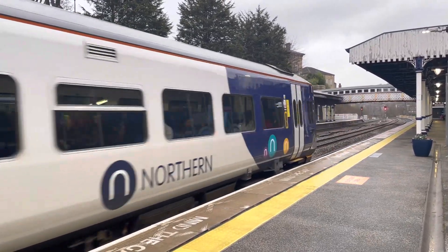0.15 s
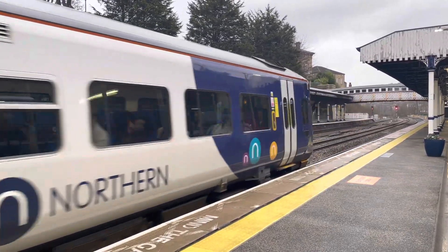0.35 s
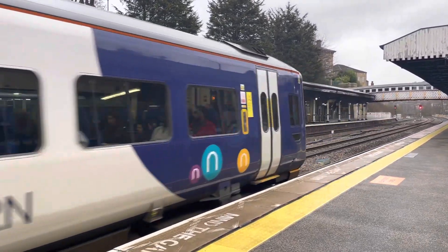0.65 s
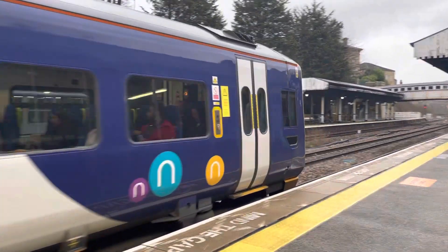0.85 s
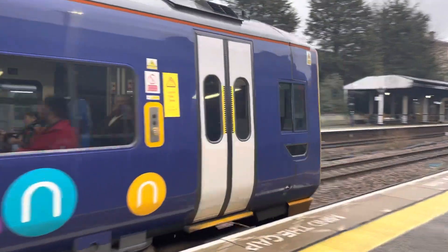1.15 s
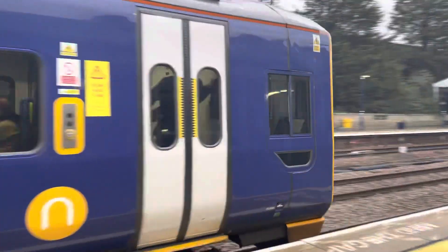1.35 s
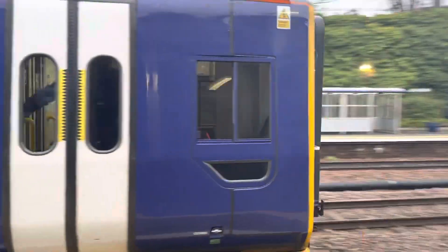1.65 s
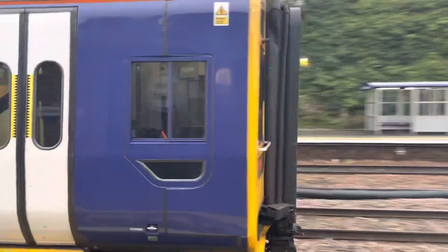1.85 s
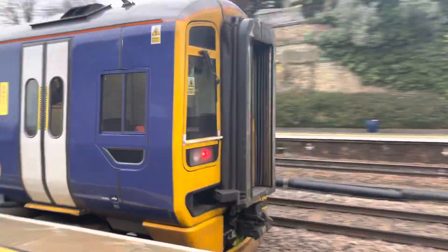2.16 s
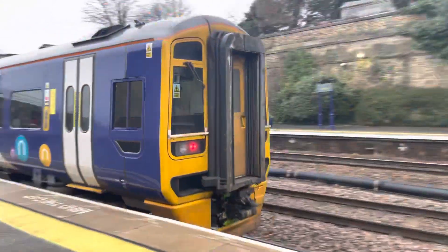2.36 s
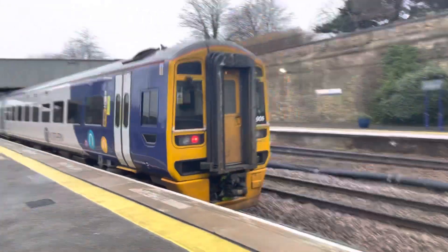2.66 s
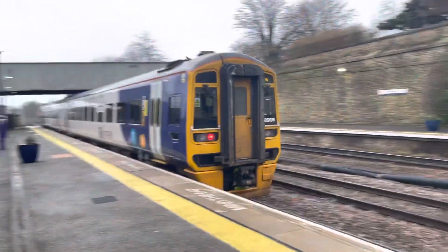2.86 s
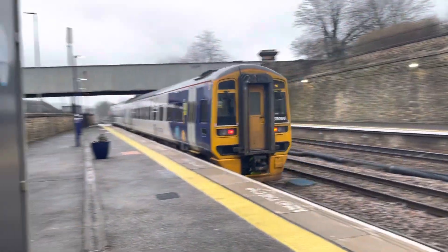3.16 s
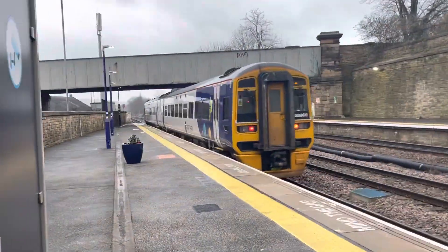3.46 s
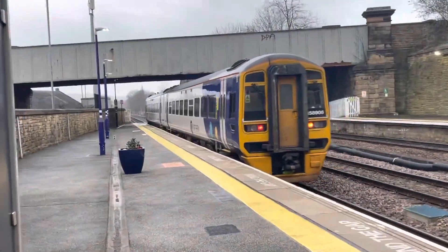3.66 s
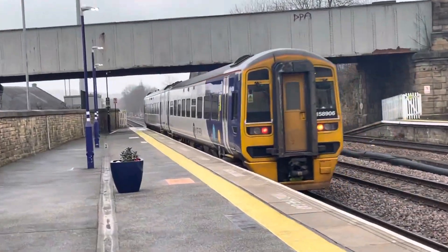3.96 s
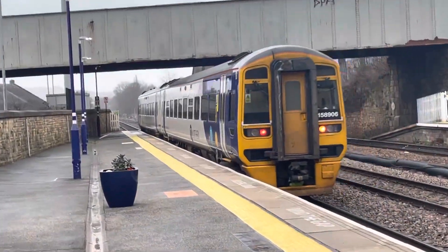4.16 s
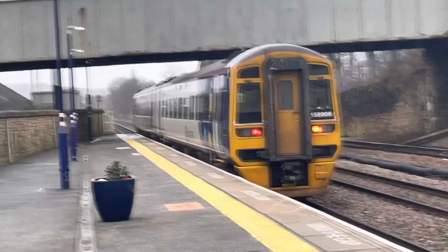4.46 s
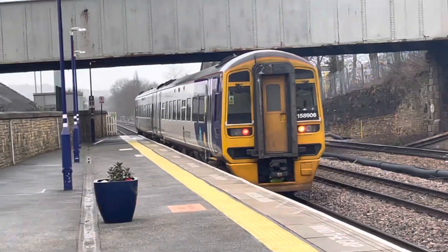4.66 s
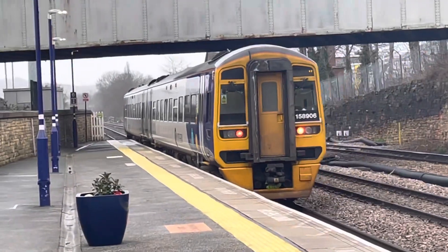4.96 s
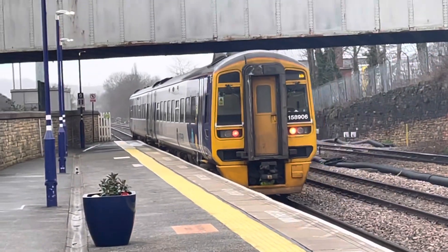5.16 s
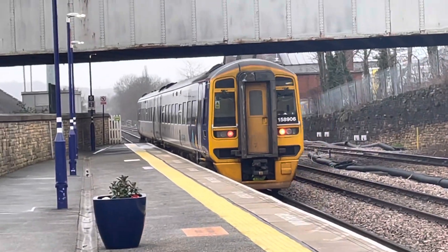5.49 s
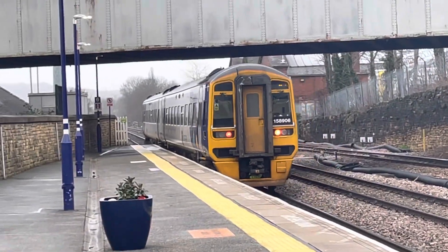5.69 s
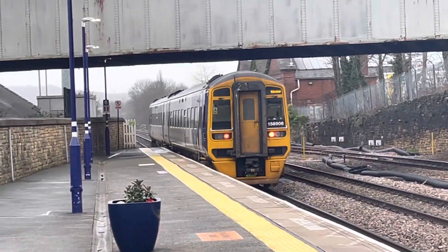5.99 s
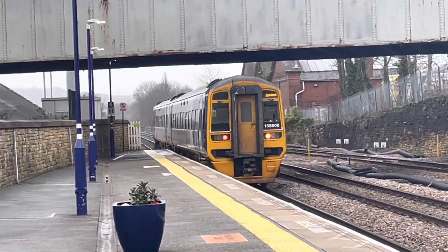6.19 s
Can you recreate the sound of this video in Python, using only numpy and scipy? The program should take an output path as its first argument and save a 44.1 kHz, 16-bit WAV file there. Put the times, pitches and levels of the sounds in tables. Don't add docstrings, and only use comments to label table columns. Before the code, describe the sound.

A diesel passenger train departs under power beside an open-air platform, heard on a handheld phone. Two underfloor engines slightly out of step make a beating low drone inside a broad rough roar, with gear whine above. Around one second the last wheels knock hard over a rail joint in two clusters. Wind rumbles on the microphone while the roar loses its close edge and settles ahead.

```python
import sys
import numpy as np
from scipy import signal
from scipy.fft import rfft, irfft, next_fast_len
from scipy.io import wavfile

SR = 44100
rng = np.random.default_rng(int(sys.argv[2]) if len(sys.argv) > 2 else 0)


def field_ratio(decibels):
    return 10 ** (np.asarray(decibels, dtype=float) / 20)


def wav_record(signal):
    frames = np.transpose(np.atleast_2d(signal))
    bounded = np.clip(frames, -1, 1)
    quanta = np.round(bounded * 32767).astype(np.int16)
    wavfile.write(sys.argv[1], SR, quanta)


N = 279153


def rms_one(x):
    return x / np.sqrt(np.mean(x ** 2) + 1e-20)


def in_time(rows):
    s, *columns = np.transpose(rows)
    return [np.interp(np.arange(N) / SR, s, c) for c in columns]


def at_hz(points, hz):
    points = np.array(points)
    return np.interp(np.log(hz), np.log(points[:, 0]), points[:, 1])


def drift(rate_hz):
    pole = np.exp(-80 * np.pi * rate_hz / SR)
    white = rng.standard_normal(N // 40 + 2002)
    slow = signal.lfilter([1], [1, -2 * pole, pole * pole], white)[2000:]
    return np.interp(np.arange(N) / 40, np.arange(len(slow)), rms_one(slow))


def band(x, low_hz, high_hz, order=2):
    return signal.sosfilt(signal.butter(order, [low_hz, high_hz], "band", fs=SR, output="sos"), x)


def turning(hz):
    return 2 * np.pi * np.cumsum(hz) / SR


def narrow(phase, width_hz):
    pole = np.exp(-10 * np.pi * width_hz / SR)
    white = rng.standard_normal((2, N // 10 + 2))
    a, b = signal.lfilter([1], [1, -2 * pole, pole * pole], white)
    slow = np.interp(np.arange(N) / 10, np.arange(len(a)), a + 1j * b)
    return rms_one((slow * np.exp(1j * phase)).real)


def swells(rows, floor_db):
    t = np.arange(N) / SR
    bells = sum(field_ratio(db) ** 2 * np.exp(-((t - s) / half) ** 2) for s, db, half in rows)
    return np.sqrt(field_ratio(floor_db) ** 2 + bells)


# [time_s, firing_hz]
REAR_FIRING = [(0, 80.5), (1.1, 80.5), (1.7, 79.32), (5.3, 78.78), (6.05, 84.7), (6.33, 86)]
# [time_s, firing_hz]
MIDDLE_FIRING = [(0, 80.4), (1.7, 80.26), (2.25, 79.9), (2.45, 81.9), (2.8, 79.74), (3.25, 79.8),
                 (3.5, 81.2), (4.4, 80.55), (4.7, 78.73), (5.5, 78.6), (5.8, 83), (6.33, 86.1)]
# [time_s, following_swell_db, front_minus_rear_db]
OPPOSED_FIRINGS = [(-0.2, -15.5, 6), (0.26, -14.5, -11.5), (0.735, -13.5, -0.5), (1.225, -20.5, -4.5),
                   (1.77, -23, -1.5), (2.3, -28.5, -6), (2.69, -18.5, -7), (3.1, -16, -7), (3.5, -17, 4.5),
                   (3.93, -14.5, -1), (4.34, -18.5, 0.5), (4.81, -23, -1.5), (5.14, -19, 2),
                   (5.58, -19.5, -9), (6.08, -24.5, 0.5), (6.5, -24, 3)]
# [time_s, rear_db, front_re_rear_db]
EXHAUST_DRONE = [(0.0, -20, 0.5), (0.2, -25.5, -4), (0.6, -24.5, -3.5), (0.8, -24, -10), (0.98, -20, -8),
                 (1.2, -31, -10), (1.55, -29, 0), (1.85, -23.5, -18), (1.95, -28.5, -19), (2.15, -19, -32),
                 (2.4, -16, -41), (3.05, -25.5, -3.5), (3.3, -25, 0), (4.1, -26, -4.5), (4.5, -27.5, -11),
                 (4.9, -22.5, -8), (5.45, -29, -5.5), (6.33, -27, -25)]
# [time_s, beats_counted]
EXHAUST_BEATS = [(0, -1.3), (.27, 0), (.85, 3), (3.12, 16), (4.0, 21), (4.59, 25), (6.0, 34), (6.33, 36)]
# [multiple, level_db]
UNEVEN_ORDERS = [(4, -34.5), (8, -35), (9, -37), (11, -39.5)]


def engines():
    t = np.arange(N) / SR
    s, swell_db, lead_db = np.transpose(OPPOSED_FIRINGS)
    half_gap = np.pi * (np.interp(t, s, np.arange(len(s))) + 0.5)
    front = field_ratio(np.interp(t, s, lead_db))
    middle = turning(in_time(MIDDLE_FIRING)[0])
    beat_db = np.interp(t, (s[1:] + s[:-1]) / 2, swell_db[:-1]) + 1.6 * drift(6.7)
    firing = np.sin(middle - half_gap) + front * np.sin(middle + half_gap)
    out = field_ratio(beat_db) / (1 + front) * firing

    rear_hz = in_time(REAR_FIRING)[0]
    rear = turning(rear_hz)
    gap = 2 * np.pi * (in_time(EXHAUST_BEATS)[0] + 0.5)
    drone_db, front_db = in_time(EXHAUST_DRONE)
    drone = np.sin(2 * rear) + field_ratio(front_db) * np.sin(2 * rear + gap)
    out += field_ratio(drone_db - 3.0 + 1.2 * drift(12)) * drone

    even_db = -2.5 * np.maximum(rear_hz - 80.5, 0)
    for multiple, level_db in UNEVEN_ORDERS:
        gain = field_ratio(level_db + even_db - 2.5 + 4.2 * drift(5.6))
        out += gain * np.sin(round(multiple) * rear / 3 + 0.96 * drift(2.3))
    return np.sqrt(2) * out


# [time_s, firing_hz]
FRONT_FIRING = [(0, 82.67), (1.2, 81.95), (5.3, 81.94), (6.05, 87.53), (6.33, 88.6)]
# [multiple_of_front_firing, width_hz, near_db, far_db]
GEAR_WHINE = [(4, 14, -29, -42.5), (7.985, 9.5, -29.5, -44), (12.01, 17, -29.5, -48.5),
              (15.88, 56, -30.5, -46), (20.12, 40, -39, -52.5), (25.51, 270, -39.5, -46.5)]
# [pitch_hz, width_hz, near_db, far_db]
BLOWER_DUCTS = [(5930, 700, -45.5, -53.5), (3317, 210, -63, -52), (3640, 230, -61, -53.5)]
# [centre_s, level_db, half_length_s]
TOOTH_SWELLS = [(1.95, -43, 0.21), (2.57, -44, .06), (3.07, -38, 0.088), (3.27, -38, 0.085),
                (4.0, -39, 0.36), (5.0, -36.5, 0.28), (5.9, -41.5, .5)]
# [centre_s, level_db, half_length_s]
RAIL_SWELLS = [(0.04, -20, 0.028), (0.92, -28.5, .15), (1.95, -37, 0.54), (2.75, -30, 0.32),
               (3.3, -36, 0.27), (5.4, -38, 0.14)]


def whine(near):
    front_hz = in_time(FRONT_FIRING)[0]
    teeth, still = turning(front_hz), turning(np.ones(N))
    tooth_gain = np.hypot(field_ratio(-37.5) * near, swells(TOOTH_SWELLS, -51.5))
    pair = 0.43 * narrow(23.2 * teeth, width_hz=26) + 0.6 * narrow(23.9 * teeth, width_hz=56)
    out = tooth_gain * pair

    fade_db = 0.5 * np.maximum(front_hz - 82.5, 0)
    blower_gain = np.hypot(field_ratio(-36.5) * near, field_ratio(-47.5 + 1.5 * drift(0.83) - fade_db))
    out += blower_gain * narrow(1985 * still + 24.1 * teeth, width_hz=174)
    out += field_ratio(-3) * swells(RAIL_SWELLS, -43) * narrow(735 * still, width_hz=168)

    for table, phase in (GEAR_WHINE, teeth), (BLOWER_DUCTS, still):
        for multiple, width_hz, near_db, far_db in table:
            gain = np.hypot(field_ratio(near_db) * near, field_ratio(far_db + 0.97 * drift(0.98)))
            out += gain * narrow(multiple * phase, width_hz)
    return out


# [centre_hz, level_db_per_hz]
NEAR_SPECTRUM = [(40, -52), (100, -57), (200, -52.5), (400, -52.5), (700, -51), (1100, -51.5), (1600, -61),
                 (2300, -63), (3300, -64.5), (5000, -71.5), (7000, -85.5), (9000, -74.5), (10500, -92),
                 (12500, -78)]
# [centre_hz, level_db_per_hz]
FAR_SPECTRUM = [(40, -57), (100, -57.5), (200, -51), (400, -55.5), (700, -62), (1100, -64), (1600, -72),
                (2300, -71), (3300, -75), (5000, -82), (7000, -99.5), (8700, -77.5), (10500, -91.5),
                (12500, -87.5)]
# [time_s, hiss_hz, hiss_db, roar_above_11_khz_db]
TOP_BAND = [(0, 13000, -110, 0), (5.45, 13000, -105, 3.5), (5.7, 13300, -76, -4), (6.33, 13400, -77, -9)]


def roar(near, far, air, bridge, bogie):
    out, edges_hz = 0, 36 * 2 ** (np.arange(27) / 3)
    white = rng.standard_normal((2, 2, N)) * np.sqrt(SR / 2)
    puffs = 1 + 0.035 * np.cos(turning(in_time(REAR_FIRING)[0]))
    swell = field_ratio(0.5 * drift(3.4)) * puffs
    for k, (low_hz, high_hz) in enumerate(zip(edges_hz, edges_hz[1:])):
        hz = np.sqrt(low_hz * high_hz)
        passing = 1
        if 2100 < hz < 5500:
            passing = bridge
        elif 280 < hz < 1400:
            passing = bogie
        near_gain = field_ratio(at_hz(NEAR_SPECTRUM, hz)) * near
        far_gain = field_ratio(at_hz(FAR_SPECTRUM, hz)) * far * passing
        gain = np.hypot(near_gain, far_gain) * field_ratio(1.5 * drift(7.5))
        if hz > 7000:
            gain = gain * air
        out = out + gain * band(white[k % 2], low_hz, high_hz)
    top = band(out, 11000, 15500)
    return (out + (field_ratio(in_time(TOP_BAND)[2]) - 1) * top) * swell


# [centre_s, deep_db, half_length_s, upper_minus_deep_db]
WIND_GUSTS = [(0.0, -40, .07, 4), (0.523, -30, 0.17, -6), (0.684, -31, 0.075, 4), (0.818, -24, 0.084, -16),
              (1.01, -23, 0.11, -0.5), (1.26, -23.5, 0.16, 1), (1.517, -24.5, 0.093, -4),
              (1.8, -33.5, 0.23, 3.5), (2.16, -36, 0.08, 1), (2.877, -25, 0.15, -5), (3.06, -29, 0.055, 3),
              (3.18, -26.5, 0.084, -1), (3.43, -23, .08, -12), (3.64, -22.5, 0.054, -3),
              (3.944, -32.5, 0.076, 4), (4.42, -22, 0.071, -20), (4.57, -35, 0.063, -1),
              (4.932, -30, 0.14, 3.5), (5.232, -28, .07, 4.5), (5.37, -33.5, 0.05, 8.5),
              (5.55, -33, .13, -3)]


def gusts():
    calm_db = -43
    deep = rms_one(band(rng.standard_normal(N), 49.8, 70.5))
    upper = rms_one(band(rng.standard_normal(N), 80, 132.5))
    deep_gain = swells([row[:3] for row in WIND_GUSTS], calm_db)
    upper_rows = [(s, db + upper_db, half) for s, db, half, upper_db in WIND_GUSTS]
    upper_gain = swells(upper_rows, calm_db - 7.0)
    return deep_gain * field_ratio(1.8 * drift(11)) * deep + upper_gain * field_ratio(3.0 * drift(16.4)) * upper


# [start_s, peak_db, ring_hz, blow_length_s, rattle_db]
JOINT_BLOWS = [
    (0.97, -2, 274, 0.0039, -10.5),
    (0.988, -8, 285, .008, -8.5),
    (1.064, -15.5, 178, 0.00645, -6),
    (1.133, -16.5, 269, 0.0077, -3),
    (1.237, -15, 236, 0.0062, -6.5),
    (1.309, -1, 280, 0.0032, -13),
    (1.329, -18, 340, 0.0056, -7.5),
    (1.366, -19.5, 327, 0.0044, -4.5),
]


def joint():
    out, t = np.zeros(N), np.arange(SR // 8) / SR
    for start_s, level_db, hz, length_s, rattle_db in JOINT_BLOWS:
        bell = np.exp(-((t - 1.38 * length_s) / length_s) ** 2)
        thud = bell * -np.cos(2 * np.pi * hz * (t - 1.544 * length_s))
        rattle_env = np.clip(t / (4 * length_s), 0, 1) ** 2 * np.exp(-t / 0.032)
        rattle_noise = rms_one(band(rng.standard_normal(len(t)), 290, 430))
        rattle = field_ratio(rattle_db) * rattle_env * rattle_noise
        crack_noise = rms_one(band(rng.standard_normal(len(t)), 500, 1630, order=1))
        crack = field_ratio(-26) * np.exp(-t / 0.0099) * crack_noise
        at = round(start_s * SR)
        out[at:at + len(t)] += field_ratio(level_db + 1.5) * (thud + rattle + crack)
    return out


# [time_s, left_share_0_1, left_minus_right_db, middle_band_width_0_1]
TRAIN_BEARING = [(0, 0.75, -1.5, 0.5), (2.3, 0.52, -0.5, 0.7), (2.9, 0.27, 1, 0.98), (3.53, 0.12, 2, 1),
                 (3.57, 0, 0, 0.19), (6.33, 0, 0, 0.02)]
# [pitch_hz, re_direct_db]
ECHO_SPECTRUM = [(60, -2), (300, -13.5), (700, -9.5), (1300, -6), (1950, 0.5), (2300, -8.5), (4300, -16.5),
                 (6000, -1), (6400, -14), (8300, -19), (10200, -11), (10500, -24), (12200, -24),
                 (12500, -7.5)]
# [pitch_hz, right_lead_rad]
HOUSING_PHASE = [(60, 0), (900, -.35), (1700, .6), (2200, 0), (6000, 0), (6900, .7), (7500, 2.2),
                 (7800, 2.95), (8200, np.pi), (8700, 3.3), (9100, 4.0), (10300, 5.3), (10600, 6.0),
                 (11400, 2 * np.pi), (12200, 6.55), (13000, 7.3), (14000, 9.4)]
# [pitch_hz, left_minus_right_db]
PORT_BALANCE = [(60, -1.5), (250, -2.5), (600, 1), (1400, 2.5), (2500, 1)]
# [pitch_hz, left_minus_right_db]
HOUSING_SHADE = [(1000, 0), (1500, -9), (2100, -8), (3300, 1.5), (5500, -4), (7500, -2.5)]


def ports(left, ahead, echoes):
    left_lead_s = 0.000447
    pan_db, width = in_time(TRAIN_BEARING)[1:]
    size, side = next_fast_len(N), np.array([[1], [-1]])
    hz = np.maximum(np.fft.rfftfreq(size, 1 / SR), 1)
    housing = at_hz(HOUSING_PHASE, hz)
    tilt = field_ratio(side * at_hz(PORT_BALANCE, hz) / 2)
    shade = field_ratio(side * at_hz(HOUSING_SHADE, hz) / 2)
    lag = np.where(hz < 6100, 2 * np.pi * hz * left_lead_s, -housing)
    from_left = irfft(rfft(left, size) * np.exp(0.5j * side * lag) * tilt * shade, size)[:, :N]
    from_ahead = irfft(rfft(ahead, size) * np.exp(-0.5j * side * housing) * tilt, size)[:, :N]
    echo = rfft(echoes, size) * field_ratio(at_hz(ECHO_SPECTRUM, hz))
    middle = (hz > 2200) & (hz < 6500)
    wide = irfft(echo * ~middle, size)[:N] + width * irfft(echo * middle, size)[:N]
    return from_left * field_ratio(side * pan_db / 2) + from_ahead + side * wide


# [time_s, level_db]
TRAIN_LEVEL = [(0, -24), (.3, 2.5), (.6, 1), (.9, -1.5), (1.7, -0.5), (2.1, 1.5), (2.5, -1), (3, -1),
               (3.75, -1.5), (4.5, -1.5), (6, -2), (6.33, -1)]
# [centre_s, level_db, half_length_s]
FACING_HISS = [(3.2, -3.5, 0.58)]
# [centre_s, re_roar_db, half_length_s]
BRIDGE_ECHO = [(4.6, -0.034, 0.83)]
# [centre_s, re_roar_db, half_length_s]
BOGIE_PASS = [(1.75, 0.6, 0.28)]


def scene():
    t = np.arange(N) / SR
    engine_db, shadow_db_per_s, gap_m, speed_m_s = -0.5, 2, 3.1, 6.34
    near = field_ratio(engine_db - shadow_db_per_s * t) * gap_m / np.hypot(gap_m, speed_m_s * t)
    far = field_ratio(in_time(TRAIN_LEVEL)[0])
    air = np.hypot(field_ratio(2.5) * near, swells(FACING_HISS, -3))
    share = np.clip(in_time(TRAIN_BEARING)[0], 0, 1)
    left, ahead = roar(near, far, air, swells(BRIDGE_ECHO, -1.1), swells(BOGIE_PASS, -0.45))
    low, teeth = engines() + gusts(), whine(near)
    echoes = np.roll(ahead + 0.2 * teeth + 0.038 * low, SR // 12)
    left = np.sqrt(share) * (left + teeth) + share * low + joint()
    ahead = np.sqrt(1 - share) * (ahead + np.roll(teeth, SR // 20)) + (1 - share) * low
    return ports(left, ahead, echoes)


def top_cut(x):
    return signal.sosfilt(signal.butter(12, 13900, fs=SR, output="sos"), x)


def record(dry):
    thin = signal.sosfilt(signal.butter(2, 36, "high", fs=SR, output="sos"), dry)
    rounded = 1.208 * np.tanh(thin / 1.194)
    cut = signal.sosfilt(signal.cheby2(24, 60, 13450, fs=SR, output="sos"), rounded)
    hiss_hz, hiss_db = in_time(TOP_BAND)[:2]
    hiss = field_ratio(hiss_db) * np.array([narrow(turning(hiss_hz), width_hz=500) for port in dry])
    return top_cut(cut + hiss)


dry = scene()
out = record(dry)
wav_record(out)
```